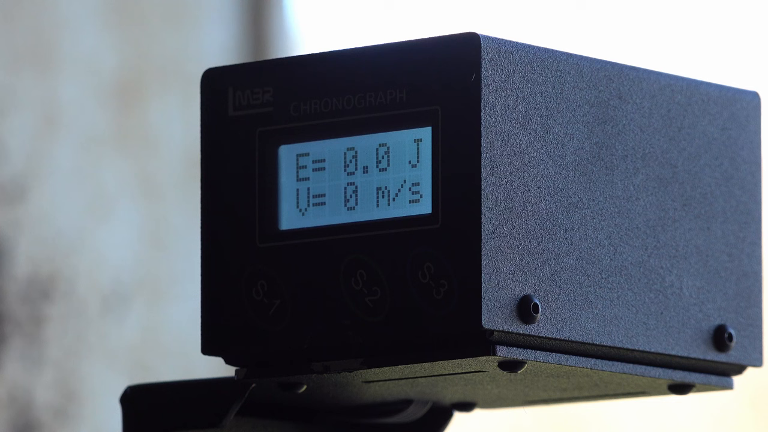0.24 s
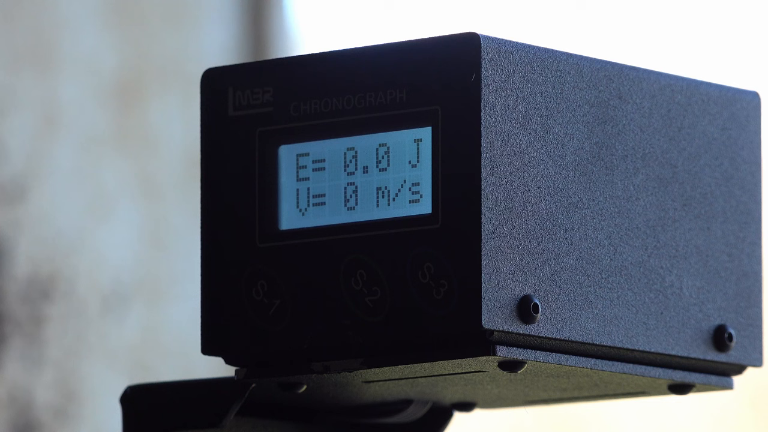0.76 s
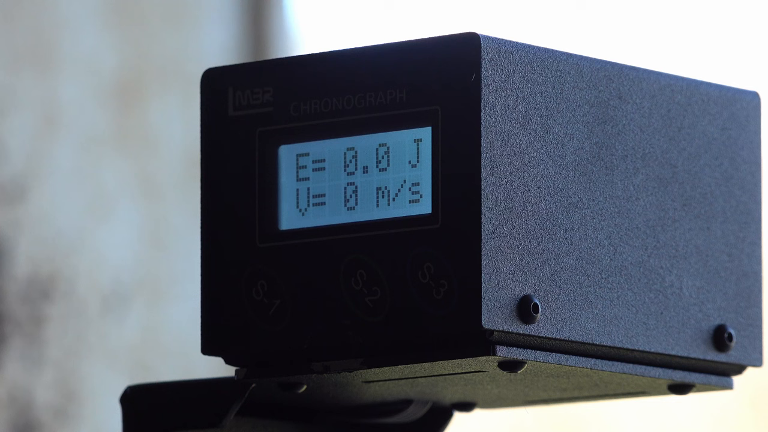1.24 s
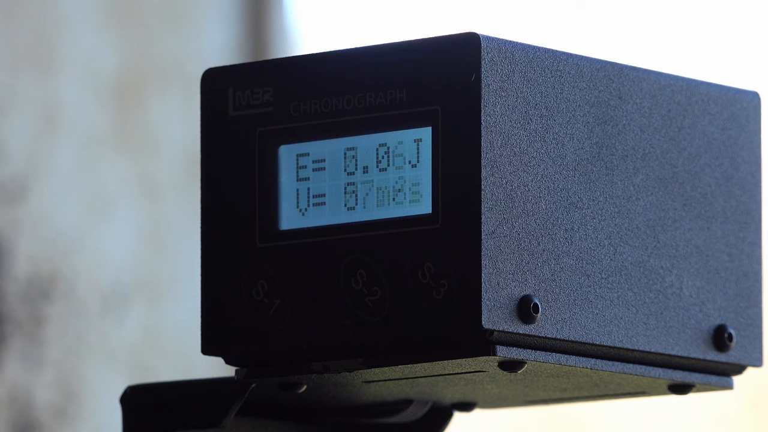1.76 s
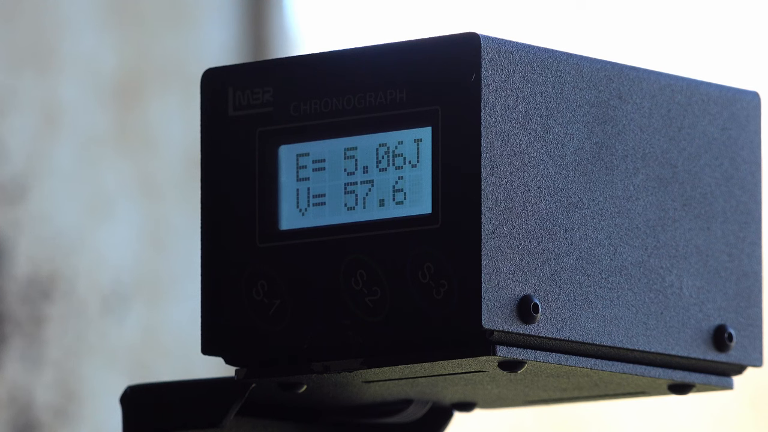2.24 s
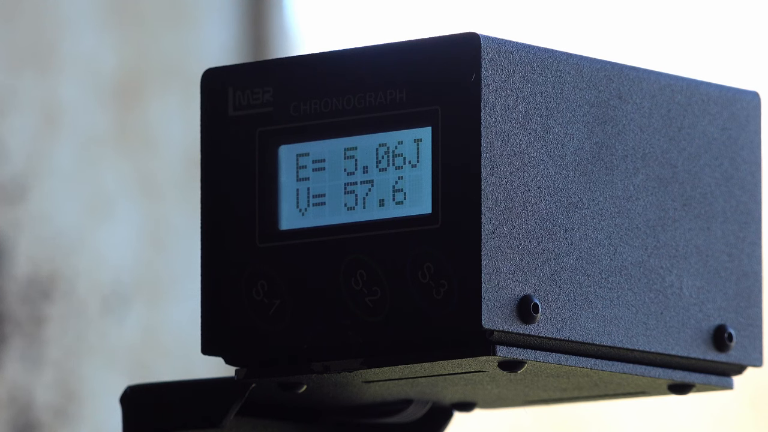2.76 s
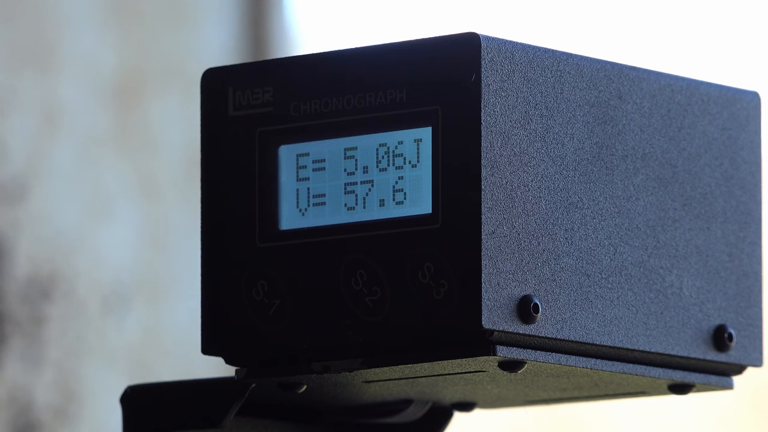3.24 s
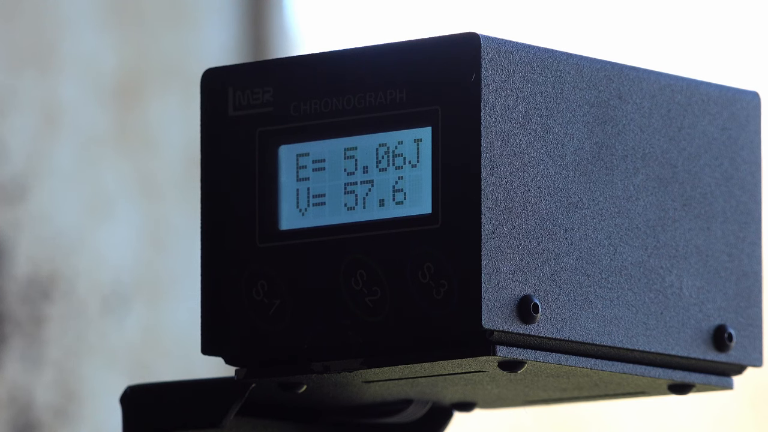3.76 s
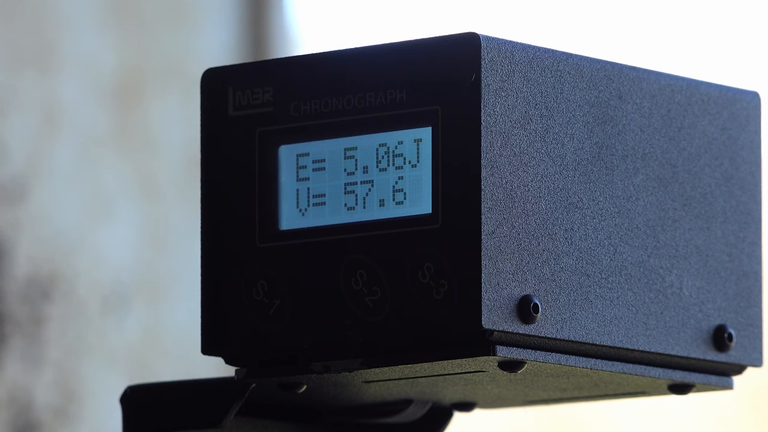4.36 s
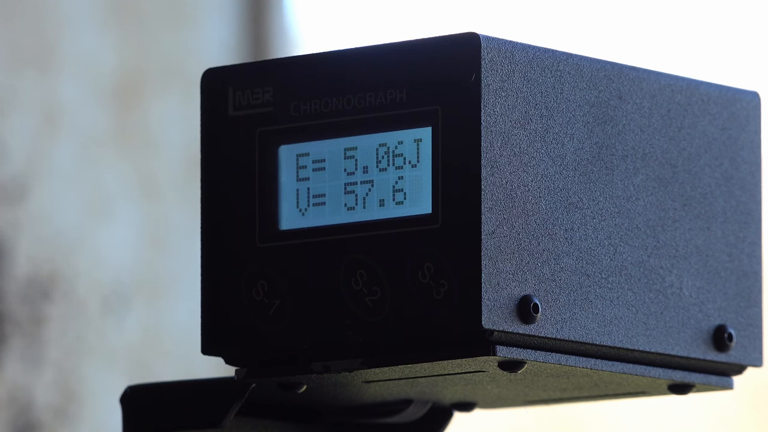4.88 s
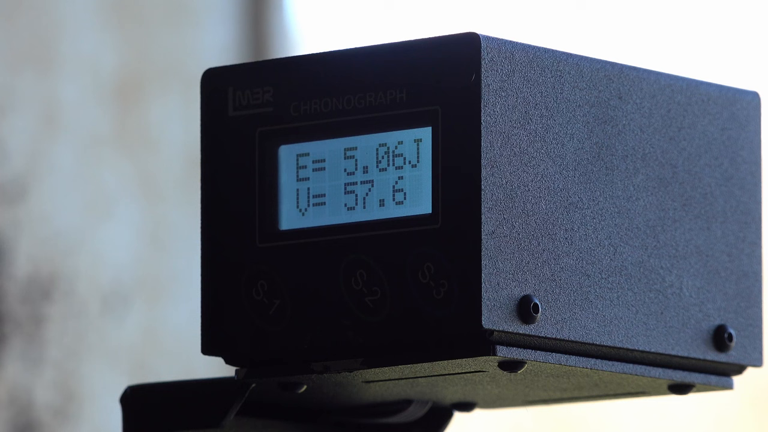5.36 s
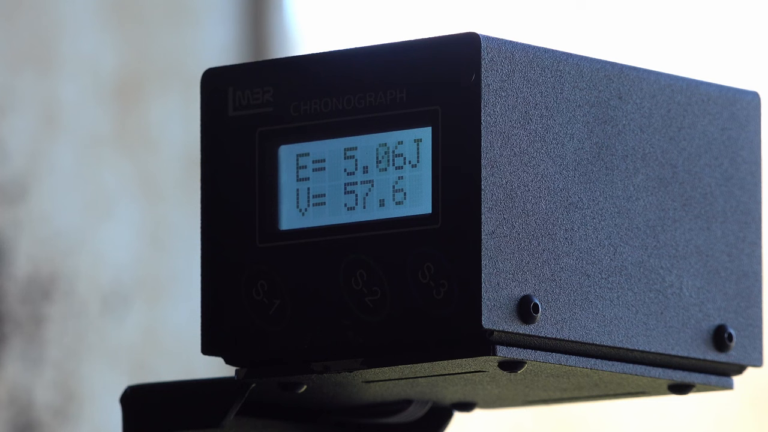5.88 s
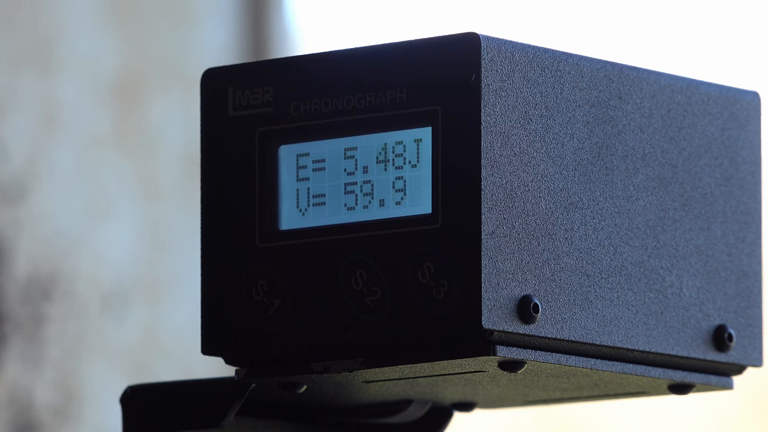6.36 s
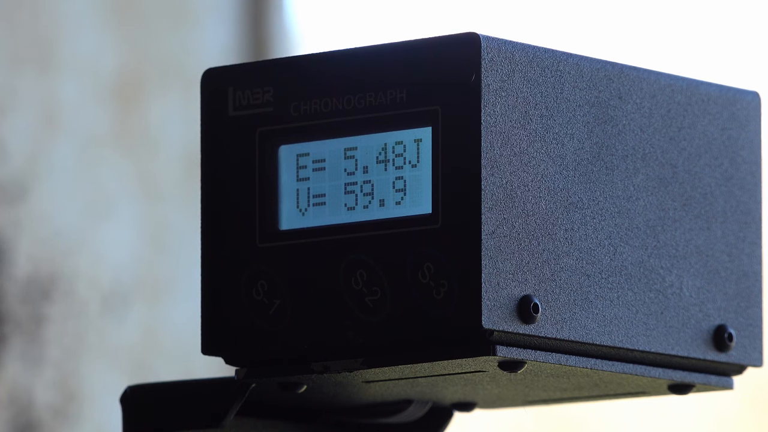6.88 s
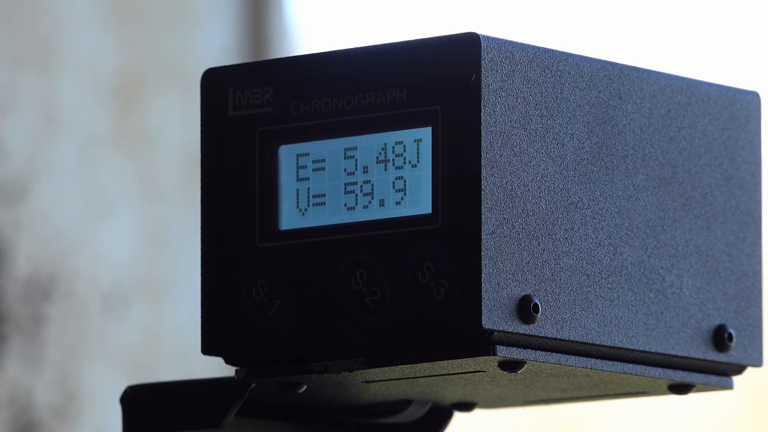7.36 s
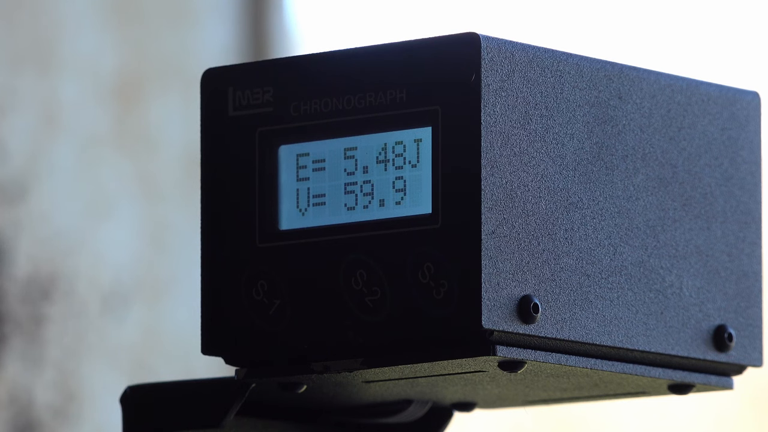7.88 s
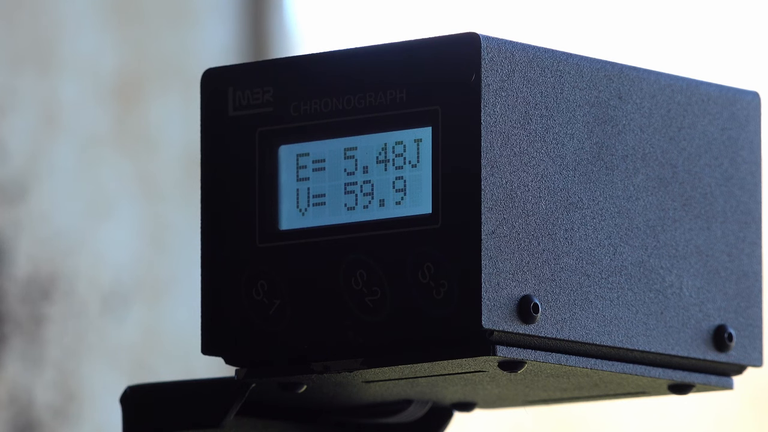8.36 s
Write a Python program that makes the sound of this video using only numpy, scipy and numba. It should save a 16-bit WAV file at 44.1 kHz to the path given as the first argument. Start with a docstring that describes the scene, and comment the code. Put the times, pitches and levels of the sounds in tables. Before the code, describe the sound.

A compressed-gas gun cracks twice indoors, the pump action racked hard after each shot, over quiet room air, faint ticking and a dull rumble before shot two.

```python
"""Pump-action launcher in a hard room

A CO2 launcher fires twice; after each shot the pump is pulled back and slammed home.
Gas blasts and metal strikes are filtered noise bursts; spring and tube ring as beating sine modes.
A few clock ticks and knocks sit over air and a low hum, and a dull rumble rises before the second shot.
The blasts overload the microphone: its gain control ducks, then lets the room's tail swell back."""
import sys
import numpy as np
from scipy import signal
from scipy.fft import rfft, irfft
from scipy.io import wavfile
from scipy.ndimage import uniform_filter1d
from numba import njit

SR = 44100
rng = np.random.default_rng(int(sys.argv[2]) if len(sys.argv) > 2 else 0)


def int16_out(signal):
    """Quantize to a 16-bit WAV file."""
    q = np.round(np.clip(np.atleast_2d(signal).T, -1, 1) * 32767)
    wavfile.write(sys.argv[1], SR, q.astype(np.int16))


N = 380583

# Filter colours are relative curves: colour() brings each filter to unit energy.
# Fall is the nominal time for a burst to drop to 1/e.

# spectrum of the room air: f/Hz, level/dB
AIR_COLOUR = [(20, 2.5), (45, -3), (90, -4.5), (170, -10.5), (320, -7.5), (430, -7.5), (560, -7),
              (750, -13.5), (1400, -18.5), (3000, -26), (7000, -30.5), (15000, -37)]
# hum tones, on top of the hum's level curve: f/Hz, level/dB
HUM_TONES = [(310, 0.5), (540, -7.5)]
# level curve of the hum: t/s, level/dB
HUM_LEVEL = [(0, -67.5), (4, -74), (7.8, -73.5), (8.4, -59), (8.6, -62.5)]
# spectrum of the dull rumble: f/Hz, level/dB
RUMBLE_COLOUR = [(60, -20), (180, -10.5), (290, -0.5), (400, 1.5), (550, -4), (750, -10.5), (1100, -15.5),
                 (1600, -35.5), (3000, -46.5)]
# dull bumps leading up to the rumble: t/s, level/dB
BUMPS = [(4.395, -46.5), (4.58, -53.5), (4.695, -49.5)]
# small knocks about the room, the far ones blurred: t/s, level/dB, fall/s
TAPS = [(0.7, -43, 0.0027), (1.985, -56, 0.012), (2.055, -47.5, 0.084), (3.724, -49, 0.0023),
        (6.31, -44.5, 0.019), (6.41, -50, 0.013)]
# clock ticks, before the trims of step and catch: t/s, level/dB
TICKS = [(0.184, -50.5), (1.184, -48.5), (4.183, -49.5), (5.184, -51), (8.183, -51)]
# spectrum of a tick: f/Hz, level/dB
TICK_COLOUR = [(500, -60), (1170, -1), (1450, -12), (1800, -6.5), (2600, -7.5), (3400, 6.5), (4200, -9),
               (5400, -7), (7500, -21), (10000, -32.5)]
# long ring of the hammer spring, relative to its ring level: f/Hz, level/dB, t60/s
SPRING_MODES = [(630, -8, 1.8), (1017, -7, 1.6), (1235, -5, 1.6), (1459, -9, 1.5), (1669, -9, 1.5),
                (1960, -7, 1.6), (2099, -9, 1.4), (2627, -9, 1.6), (2977, -7, 1.5), (3300, -9, 1.3),
                (3630, -7, 1.3), (3885, -9, 1.4), (4683, -12, 1.3), (5120, -12, 1.3), (5430, -10, 1.2),
                (13430, 4, .5)]
# ring of the steel tube, relative to each stop's ring level: f/Hz, level/dB, t60/s
TUBE_MODES = [(2625, 2, 1.4), (3400, -38, 1.1), (7456, -19.5, .6), (13450, -6, .5)]
# spectrum of the pump action: f/Hz, level/dB
ACTION_COLOUR = [(40, -40.5), (150, -28), (350, -13), (700, -7.5), (1000, -2.5), (1250, 3), (1900, 7.5),
                 (2300, 3.5), (2900, 2.5), (4200, 1.5), (5500, -1.5), (8000, -7), (9500, -14), (16000, -22)]
# resonances of the receiver: f/Hz, width/Hz, lift/dB
RECEIVER_PEAKS = [(1207, 86, 6.5), (1733, 41, 4), (2130, 42, 3.5), (2840, 43, 5.5), (3170, 400, 4),
                  (3563, 120, 3), (4770, 41, 2), (5174, 210, 8), (5506, 110, 8.5), (7460, 660, 6)]
# pump pulled back: start t/s, end stop t/s, force level/dB, thud level/dB, tube ring level/dB
PULLS = [(2.729, 2.7959, 1, -9, -62.5), (6.6065, 6.6771, -2, -2, -50)]
# pump slammed home: start t/s, end stop t/s, force level/dB, thud level/dB, tube ring level/dB
PUSHES = [(3.058, 3.1278, -0.5, -0.5, -55.5), (6.847, 6.9181, 0, 0.5, -38)]
# parts met on a pull (lock, its bounce, slide breaking free, hammer, sear, rear stop):
# share of stroke time, level/dB re force, fall/s, tilt/(dB per octave)
PULL_PARTS = [(0, -15, .0016, -1), (.125, -18.5, .0007, -1.5), (0.259, 0, .007, 0), (.645, 0, 0.0014, 3),
              (.81, 7.5, .0009, 2.5), (1, 15.5, .004, 1.5)]
# parts met on a push (slide leaving the stop, feed lip, bolt, front stop):
# share of stroke time, level/dB re force, fall/s, tilt/(dB per octave)
PUSH_PARTS = [(0, -5.5, .0014, -1), (0.724, -6, 0.00051, 12), (.772, 3.5, .0019, 1.5), (1, 12, .004, .5)]
# light clicks of grip and trigger: t/s, level/dB, fall/s, tilt/(dB per octave)
HANDLING = [(2.708, -29, 0.0018, -10.5), (5.8439, -28.5, 0.0011, 2), (6.597, -29, 0.0033, -6)]
# shots: t/s, jet level/dB, jet fall/s, pressure pulse level/dB
SHOTS = [(1.6364, 18, 0.0098, 10.5), (5.8904, 15.5, 0.013, 12.5)]
# spectrum of the gas blast: f/Hz, level/dB
BLAST_COLOUR = [(25, -8), (80, -10), (140, -1.5), (300, -1.5), (600, 3), (1000, -1), (1400, 3), (2400, 3.5),
                (3500, 4.5), (5400, 1), (6500, -3.5), (8000, -6.5), (10000, -19), (16000, -22)]
# resonances of the barrel: f/Hz, width/Hz, lift/dB
BARREL_PEAKS = [(141, 25, 4), (233.8, 230, 5), (446, 50, 7.5), (690, 90, 7.5), (917.7, 5.2, 8.5),
                (1305, 110, 4.5), (1380, 49, -1.5), (1728, 22, 2.5), (2080, 37, 4.5), (3170, 78, 7),
                (3613, 340, 4), (5110, 180, 6.5)]
# decay of the room: f/Hz, t60/s
ROOM_DECAY = [(60, .3), (150, .38), (400, .31), (1200, .34), (3500, .33), (7000, .3), (11000, .26),
              (16000, .23)]

RUMBLE_START_S, RUMBLE_END_S, RUMBLE_DB = 4.79, 5.86, -47.5
RUMBLE_RISE_S, RUMBLE_FALL_S = 0.014, .06
EDGE_HZ = 16100  # top of the microphone's band


def gain_of(db):
    """Decibels to a factor."""
    return 10 ** (np.asarray(db) / 20)


def evened(x):
    """Scales to rms 1."""
    return x / np.sqrt(np.mean(x ** 2) + 1e-20)


def read(points, hz):
    """Reads a table on a log-frequency axis."""
    f, value = np.transpose(points)
    return np.interp(np.log(hz + 1), np.log(f + 1), value)


def add(mix, s, sound):
    """Lays a sound into the mix at time s."""
    part = mix[round(s * SR):][:len(sound)]
    part += sound[:len(part)]


def seconds(length):
    """A time axis."""
    return np.arange(int(length * SR)) / SR


def colour(x, points, peaks=(), tilt=0, size=4096):
    """Causal unit-energy filter from a spectrum, resonances and a dB-per-octave tilt above 1 kHz."""
    hz = np.fft.rfftfreq(size, 1 / SR)
    db = read(points, hz) + tilt * np.log2(np.maximum(hz, 1000))
    for centre, width, lift_db in peaks:
        db = db + lift_db / (1 + (2 * (hz - centre) / width) ** 2)
    # minimum phase: the phase follows from the log gain
    log_gain = np.log(gain_of(np.r_[db, db[-2:0:-1]]))
    spectrum = np.exp(np.conj(signal.hilbert(log_gain)))
    taps = np.fft.ifft(spectrum).real
    return signal.fftconvolve(x, taps / np.linalg.norm(taps))[:len(x)]


def burst(fall, count=3):
    """A dying puff of noise with a near-even spectrum and the energy of an exponential decay from 1."""
    t = np.arange(8192) / SR
    shape = np.exp(-t / fall)
    puff = shape * rng.standard_normal(len(t))
    for _ in range(count):
        flat = irfft(np.exp(1j * np.angle(rfft(puff))))
        puff = flat * np.exp(-(t / (4 * fall)) ** 2)
    return evened(puff) * np.sqrt(np.mean(shape ** 2))


def swell(t, start, end, rise, fall):
    """An envelope that rises from start, holds until end and dies away."""
    return np.clip((t - start) / rise, 0, 1) * np.exp(-np.maximum(t - end, 0) / fall)


def air(level_db=-57):
    """Room air: steady coloured noise."""
    return gain_of(level_db) * evened(colour(rng.standard_normal(N), AIR_COLOUR))


def hum(waver_s=.15):
    """Low tones, each wavering in strength with its own smoothed noise."""
    t = np.arange(N) / SR
    out = np.zeros(N)
    for hz, db in HUM_TONES:
        waver = evened(uniform_filter1d(rng.standard_normal(N), int(waver_s * SR)))
        level = gain_of(db + np.interp(t, *np.transpose(HUM_LEVEL)))
        out += level * (1 + waver) * np.sin(2 * np.pi * hz * t)
    return out


def rumble(bump_fall_s=0.052):
    """Dull noise under an envelope: a few bumps, then a held rumble that dies away."""
    t = np.arange(N) / SR
    level = gain_of(RUMBLE_DB) * swell(t, RUMBLE_START_S, RUMBLE_END_S, RUMBLE_RISE_S, RUMBLE_FALL_S)
    for s, db in BUMPS:
        level += gain_of(db) * swell(t, s, s + RUMBLE_RISE_S, RUMBLE_RISE_S, bump_fall_s)
    return level * evened(colour(rng.standard_normal(N), RUMBLE_COLOUR))


def knocks():
    """Light dull knocks: short noise bursts, longer where blurred by distance."""
    out = np.zeros(N)
    knock_colour = [(200, -23.0), (900, -5.0), (1600, 2), (3500, 2.0),
                    (5500, -6), (8000, -19.5), (12000, -35)]  # f/Hz, level/dB
    for s, db, fall in TAPS:
        add(out, s, gain_of(db) * colour(burst(fall), knock_colour))
    return out


def clock(step_fall_s=0.03, step_db=-0.5, catch_delay_s=0.03, catch_fall_s=0.0069, catch_db=4):
    """A clock wheel steps and is then caught: a longer burst and a short, louder one."""
    out = np.zeros(N)
    for s, db in TICKS:
        add(out, s, gain_of(db + step_db) * colour(burst(step_fall_s), TICK_COLOUR))
        add(out, s + catch_delay_s, gain_of(db + catch_db) * colour(burst(catch_fall_s), TICK_COLOUR))
    return out


def ring(modes, split_hz):
    """Dying modes, each with a weaker twin close by that makes it beat."""
    t, out = seconds(2), 0
    for hz, db, t60 in modes:
        turns = hz * t + rng.random()
        twin_turns = turns + split_hz * (.5 + rng.random()) * t
        pair = np.sin(2 * np.pi * turns) + .5 * np.sin(2 * np.pi * twin_turns)
        out = out + gain_of(db - 60 * t / t60) * pair
    return out


def spring_ring(level_db=-42, haze_db=-1, haze_t60=2.9):
    """After a shot the hammer spring rings on, its haze of close modes made of decaying noise."""
    out, t = np.zeros(N), seconds(2)
    haze_colour = [(200, -12), (600, -3), (1800, 0), (3600, -2),
                   (5500, -5), (6500, -18), (12000, -40)]  # f/Hz, level/dB
    for s, *_ in SHOTS:
        haze = colour(rng.standard_normal(len(t)), haze_colour)
        haze *= gain_of(haze_db - 60 * t / haze_t60)
        add(out, s, gain_of(level_db) * (ring(SPRING_MODES, split_hz=22) + haze))
    return out


def tube_ring():
    """The steel tube rings in slowly beating modes after each end stop."""
    out = np.zeros(N)
    for _, stop, *_, ring_db in PULLS + PUSHES:
        add(out, stop, gain_of(ring_db) * ring(TUBE_MODES, split_hz=0.24))
    return out


def clack(db, fall, tilt, rattle_db=-22, rattle_s=0.012):
    """One metal part strikes and rattles in the receiver."""
    blow = burst(fall) + gain_of(rattle_db) * burst(rattle_s)
    return gain_of(db) * colour(blow, ACTION_COLOUR, RECEIVER_PEAKS, tilt=tilt)


def stroke(out_s, parts, rasp_db, rasp_rise_db):
    """The slide rasps more as it gathers speed, and strikes the same parts in turn along its travel."""
    out = np.zeros(SR // 2)
    speed = np.linspace(-1, 0, len(seconds(out_s)))  # 0 is full speed
    rasp = colour(rng.standard_normal(SR), ACTION_COLOUR)[:len(speed)]
    add(out, 0, gain_of(rasp_db + rasp_rise_db * speed) * rasp)
    for share, db, fall, tilt in parts:
        add(out, share * out_s, clack(db, fall, tilt))
    return out


def pump(thud_s=0.004206, rebound_s=.007, rebound_db=1):
    """The pump goes back and forth; at each end stop it thuds and rebounds once."""
    out = np.zeros(N)
    thud_colour = [(20, 2.0), (80, -19.0), (200, 0), (500, 2), (1200, 21.5), (3000, -29.0)]  # f/Hz, level/dB
    for start, stop, force_db, *_ in PULLS:
        pull = stroke(stop - start, PULL_PARTS, rasp_db=-8, rasp_rise_db=28)
        add(out, start, gain_of(force_db) * pull)
    for start, stop, force_db, *_ in PUSHES:
        slam = stroke(stop - start, PUSH_PARTS, rasp_db=-14.5, rasp_rise_db=24.5)
        add(out, start, gain_of(force_db) * slam)
    for _, stop, force_db, thud_db, _ in PULLS + PUSHES:
        add(out, stop, gain_of(thud_db) * colour(burst(thud_s), thud_colour))
        add(out, stop + rebound_s, clack(force_db + rebound_db, fall=0.0018, tilt=1.0))
    return out


def handling():
    """Light clicks of the grip being taken up and of the trigger, heard through the receiver."""
    out = np.zeros(N)
    for s, db, fall, tilt in HANDLING:
        add(out, s, clack(db, fall, tilt))
    return out


def pressure_pulse(width):
    """A pressure pulse with its suction phase."""
    u = seconds(.5) / width
    return (1 - u) * np.exp(-u)


def shots(pulse_s=0.0023, bounce_s=.017, bounce_db=-1):
    """The valve dumps gas through the barrel: a pulse, a jet, and a second jet as the hammer bounces."""
    out = np.zeros(N)
    for s, db, fall, pulse_db in SHOTS:
        add(out, s, gain_of(pulse_db) * pressure_pulse(pulse_s))
        for delay, change_db in [(0, 0), (bounce_s, bounce_db)]:
            jet = colour(burst(fall), BLAST_COLOUR, BARREL_PEAKS)
            add(out, s + delay, gain_of(db + change_db) * jet)
    return out


def room(x, first_s=0.0053, near_s=0.0032, near_db=-5, wet_db=-5):
    """Quick scatter off the bench and nearby things, then dense wall reflections dying band by band."""
    hz, t, bands = signal.stft(rng.standard_normal(SR), SR, nperseg=256)
    decay = gain_of(-60 * t / read(ROOM_DECAY, hz)[:, None])
    tail = signal.istft(bands * decay, SR, nperseg=256)[1]
    # fade in from half of first_s to one and a half times it
    tail *= np.clip(np.arange(len(tail)) / SR / first_s - .5, 0, 1)
    echoes = gain_of(wet_db) * tail / np.linalg.norm(tail)
    near = burst(near_s)
    add(echoes, .001, gain_of(near_db) * near / np.linalg.norm(near))
    return x + signal.fftconvolve(x, echoes)[:N]


def scene():
    """Strikes and blasts pass through the room; the long rings and the background are laid on top."""
    background = air() + hum() + rumble()
    small_things = knocks() + clock()
    ringing = spring_ring() + tube_ring()
    launcher = pump() + handling() + shots()
    return (room(launcher + small_things) + ringing + background)[None]


@njit
def ducking(x, threshold, attack, hold, release, linger_db, recover):
    """Gain cut in dB: grows on each overshoot, holds, springs back, and its last part fades slowly."""
    out, cut, slow, wait = np.zeros(len(x)), 0., 0., 0.
    for i in range(len(x)):
        # slow: the floor under the quick release
        fresh = min(cut - release, linger_db) if wait > 0 else 0.
        slow = max(slow - recover, fresh, 0.)
        if abs(x[i]) * 10 ** (-cut / 20) > threshold:
            cut, wait = cut + attack, hold
        elif wait > 0:
            wait -= 1
        else:
            cut = max(cut - release, slow)
        out[i] = cut
    return out


def record(dry, linger_db=9, recover_db_s=2.0):
    """Gain control too slow for the blasts, clipping, the coupling capacitor and the band limit."""
    threshold, ceiling = .56, .6  # of full scale
    attack_db_s, hold_s, release_db_s = 2800, .032, 360
    cut_db = ducking(dry[0], threshold, attack_db_s / SR, hold_s * SR, release_db_s / SR,
                     linger_db, recover_db_s / SR)
    clipped = np.clip(dry * gain_of(-cut_db), -ceiling, ceiling)
    coupled = signal.lfilter(*signal.butter(1, 15, "highpass", fs=SR), clipped)
    band_limit = signal.firwin(255, EDGE_HZ, window=("kaiser", 9), fs=SR)
    return signal.oaconvolve(coupled, band_limit[None], "same")


dry = scene()
out = record(dry)
int16_out(out)
```